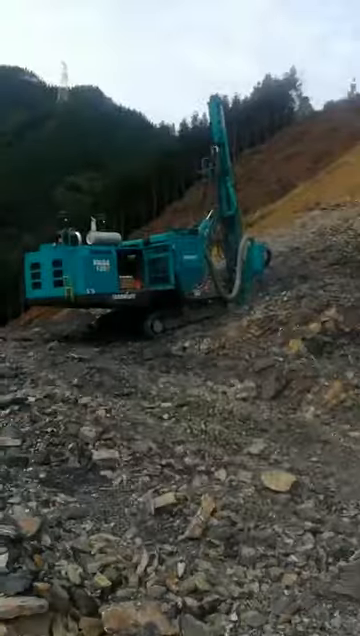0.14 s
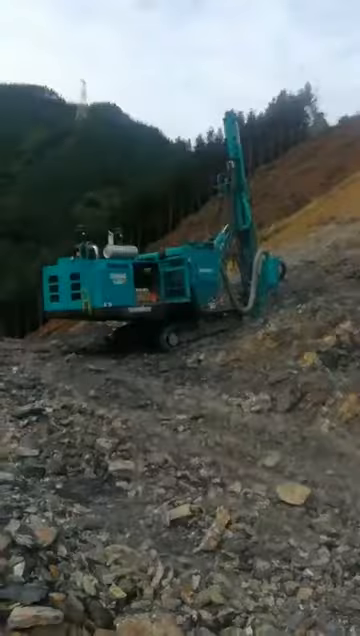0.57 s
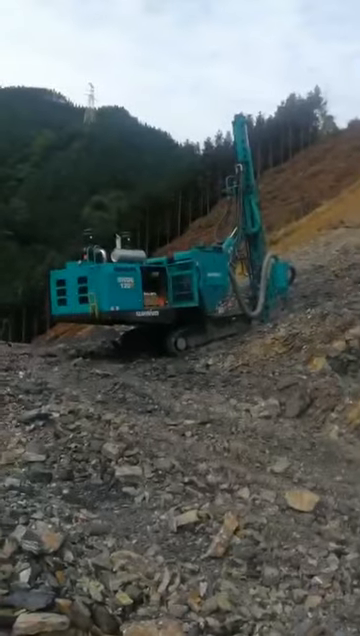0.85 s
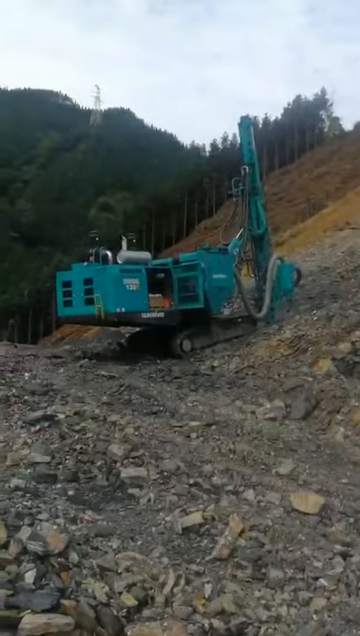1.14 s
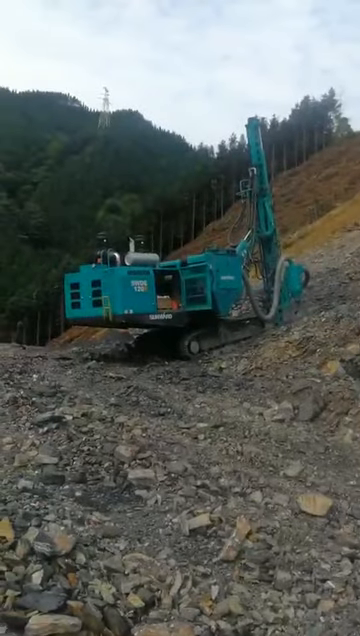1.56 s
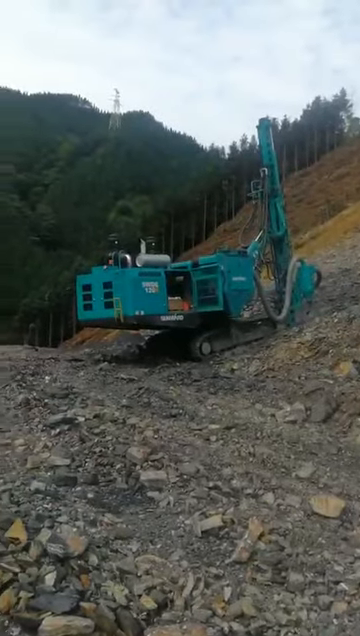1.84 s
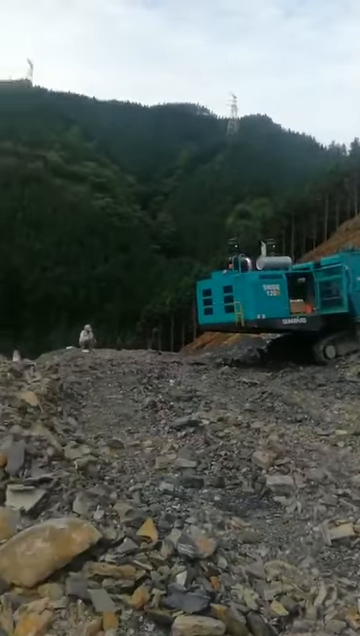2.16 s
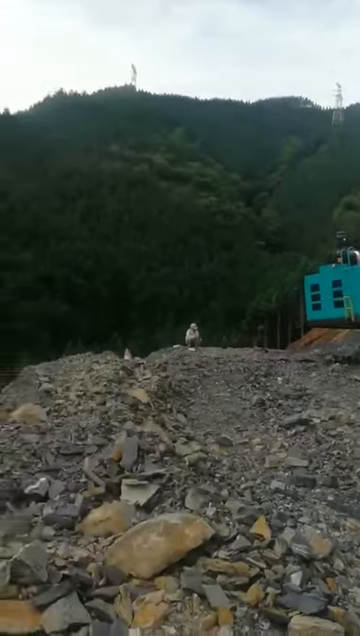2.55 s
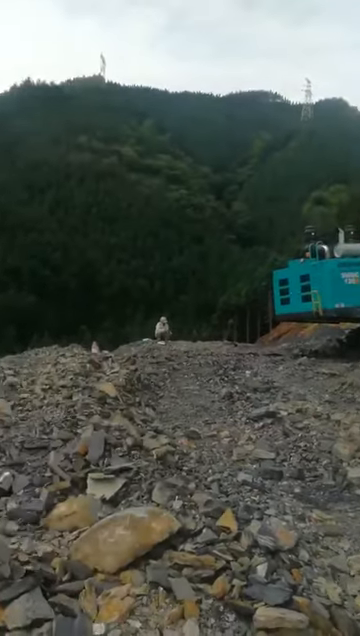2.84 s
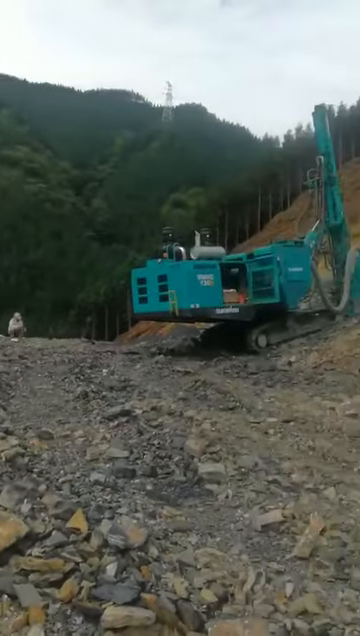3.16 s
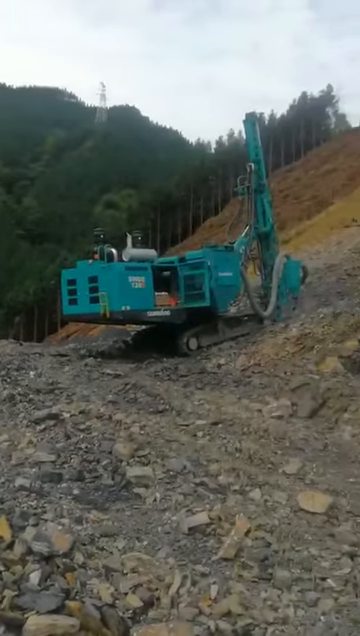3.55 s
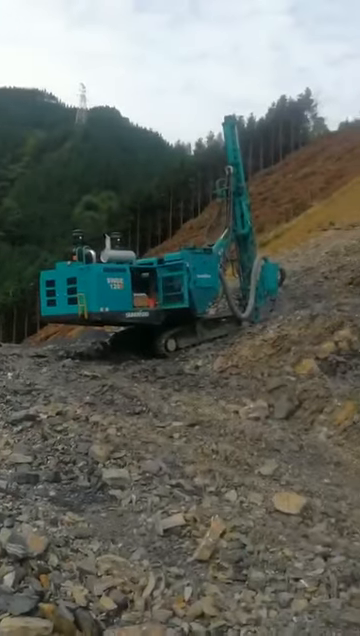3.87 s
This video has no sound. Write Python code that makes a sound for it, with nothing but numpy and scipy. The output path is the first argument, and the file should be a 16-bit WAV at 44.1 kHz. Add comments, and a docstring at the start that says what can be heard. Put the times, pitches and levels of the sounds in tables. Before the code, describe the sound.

After a brief silence, a drilling rig's rough engine roar cuts in abruptly, ticking and whining; two compressed-air bursts follow, the second while the handheld microphone is turned away, outdoors at moderate distance.

```python
"""Diesel drilling rig

A diesel drilling rig runs steadily on an open slope, to the right of a hand-held camera.
Wavering sinusoids give firing orders, exhaust hum and pump whine; shaped noise gives the roar.
Struck modes make a metal part tick; gated noise makes two bursts of compressed air.
The camera swings away and back, heard as a passing upper roar; its two ports differ in colour and phase.
"""
import sys
import numpy as np
from scipy import signal
from scipy.fft import rfft, irfft, next_fast_len
from scipy.io import wavfile
from scipy.ndimage import uniform_filter1d

SR = 44100
rng = np.random.default_rng(int(sys.argv[2]) if len(sys.argv) > 2 else 0)


def elevation(decibels):
    """Turn decibel levels (scalar or array-like) into linear amplitude ratios."""
    levels = np.asarray(decibels, float)
    return 10 ** (levels / 20)


def wav_record(signal):
    """Record a signal, one row per channel, as 16-bit PCM in the file named by sys.argv[1]."""
    frames = np.transpose(np.atleast_2d(signal))
    bounded = np.clip(frames, -1, 1)
    # unit amplitude maps onto the largest positive 16-bit level
    quanta = np.round(bounded * 32767).astype(np.int16)
    wavfile.write(sys.argv[1], SR, quanta)


N = 176400


def clock():
    """Sampling: time of each sample in seconds."""
    return np.arange(N) / SR


def curve(rows, column=1):
    """Linear interpolation in time: one column of a table, per sample."""
    return np.interp(clock(), [r[0] for r in rows], [r[column] for r in rows])


def read(rows, hz, column=1):
    """Interpolation on a logarithmic frequency axis: one column of a table."""
    return np.interp(np.log(hz + 1), np.log([r[0] + 1 for r in rows]), [r[column] for r in rows])


def evened(x):
    """Power normalisation: scales the rms to one."""
    return x / np.sqrt(np.mean(abs(x) ** 2) + 1e-20)


def slow(width_hz):
    """Narrow-band fluctuation: complex noise through a double pole drifts at about the given rate."""
    r = np.exp(-np.pi * width_hz / SR)
    z = rng.standard_normal(N + SR) + 1j * rng.standard_normal(N + SR)
    settled = signal.lfilter([1], [1, -2 * r, r * r], z)[SR:]
    return evened(settled)


def smoothed_grid(shape, bins, frames):
    """Correlated fluctuation: random values averaged over neighbouring bins and frames."""
    smooth = uniform_filter1d(rng.standard_normal(shape), bins, 0)
    return evened(uniform_filter1d(smooth, frames, 1))


def patchy():
    """Non-stationary turbulence: two white noises, unit power per Hz, share one fluctuating spectrum."""
    z = signal.stft(rng.standard_normal((2, N)), nperseg=512, noverlap=384)[2]
    patches = smoothed_grid(z.shape[1:], 5, 14)
    flicker = smoothed_grid(z.shape[1:], 40, 3)
    swell = slow(4.0).real[np.minimum(np.arange(z.shape[2]) * 128, N - 1)]
    z = z * elevation(1.2 * patches + 0.8 * flicker + 0.3 * swell)
    noises = signal.istft(z, nperseg=512, noverlap=384)[1][:, :N]
    return evened(noises) * np.sqrt(SR / 2)


def line(hz, db, rough, width_hz):
    """Modulation of a carrier: noise makes a tone waver in height and phase (rough 0-1)."""
    rough = np.clip(rough, 0, 1)
    carrier = np.exp(2j * np.pi * (np.cumsum(hz) / SR + rng.random()))
    envelope = np.sqrt(1 - rough ** 2) + rough * slow(width_hz)
    return np.sqrt(2) * elevation(db) * (envelope * carrier).real


# How the left port differs from the right:
# f/Hz, left minus right level/dB, likeness [0-1, before the power in ports()], left phase lead/rad
PORTS = [(25.0, 0.2, 0.99, -0.25), (89, 0.3, 1, -0.15), (217, 0.5, 0.93, -0.5), (325, -1.0, 1, -1.3),
         (469, -2.5, 1, -1.4), (610, -6.5, 0.99, -2.0), (770, -15, 0.96, -3), (832, -13, 0.9, -4.5),
         (873, -1.5, 0.3, -6), (960, -4.5, 0.93, -7.5), (1250.0, -7.5, 0.66, -7.0), (1450, -6.5, 1, -7.5),
         (1740, -18, 1, -7.5), (1980, -11.5, 1, -5.5), (2300, -7.5, 0.64, -8), (2770, -18.5, 0.63, -8.5),
         (2980, -7.5, 0.4, -6.5), (3360, -1.0, 0.74, -6.0), (3930, -9.5, 0.07, -4),
         (4200.0, -6.5, 0.55, -2.5), (4930, 0, 0.42, -3.0), (5500, -6, 0.4, 0), (5880, -5.5, 0.4, 3),
         (6850, 0, 0.75, 3.5), (7820, 0, 1, 5), (9100, -2, 0, 5), (9100, 0, 0.83, 15),
         (12000, -4.5, 0.2, 8), (14000.0, -6, 0.4, 7.5), (15200.0, 3, 0.08, -5)]


def ports(direct, scattered, left_db, right_db):
    """Interaural coherence: right hears direct sound, left a phase-shifted share plus scattered sound."""
    size = next_fast_len(N + 4096)
    hz = np.fft.rfftfreq(size, 1 / SR)
    direct, scattered = np.pad([direct, scattered], ((0, 0), (0, size - N)), "reflect")
    direct, scattered = rfft(direct), rfft(scattered)
    same = np.clip(read(PORTS, hz, column=2), 0, 1) ** 0.6
    lead = np.exp(1j * read(PORTS, hz, column=3))
    left = same * lead * direct + np.sqrt(1 - same ** 2) * scattered
    both = np.array([left * elevation(left_db(hz)), direct * elevation(right_db(hz))])
    return irfft(both, size)[:, :N]


def rig_ports(direct, scattered):
    """Diffraction at the listener: the left port is coloured against an uncoloured right."""
    return ports(direct, scattered, lambda hz: read(PORTS, hz), lambda hz: 0 * hz)


# Common gain of roar and casing: t/s, level/dB
RIG_LEVEL = [(.43, 4), (.75, 4), (.96, 3), (1.02, .5), (1.4, 0.5), (2, 0.5), (2.5, 0), (2.9, 0.5),
             (3.2, 0.86), (3.6, 0.5), (4, 0.5)]


def rig_gain():
    """Amplitude scaling: the gain shared by roar and casing over time."""
    return elevation(curve(RIG_LEVEL))


# Running count of the ticks: t/s, tick number
TICK_CLOCK = [(.4329, 0), (1.7419, 32), (2.9307, 61), (3.0993, 65), (4.004, 87)]


def tick_count():
    """Phase of a periodic event: each whole number is one tick."""
    return curve(TICK_CLOCK)


# Colour of the roar at the right port: f/Hz, relative level/dB per Hz
ROAR_COLOUR = [(25, -26), (45, -14.5), (110, -13.5), (160, -14.5), (220, -12.5), (270, -4.5), (330, -10),
               (390, -19.5), (460, -8), (600, -5.5), (760, -3.5), (830, -4.5), (900, -16.5), (1020, -5.5),
               (1250, -7.5), (1450, -4), (1700, -1.5), (1950, -4), (2330, -10), (2750, -9), (3000, -16),
               (3350, -24), (3800, -17), (4200, -18.5), (4800, -20), (5400, -28), (5900, -22),
               (6700, -29.5), (7700, -31.5), (8600, -36), (9300, -40.5), (10200, -42), (11500, -38.5),
               (12500, -50.5), (14000, -42), (15200, -65)]
# Extra gain of the roar above the high-pass edge: t/s, level/dB
TREBLE = [(.43, 3), (1.5, 2.5), (2, 4), (2.5, 1.5), (2.8, 2), (3.6, -2.5), (3.8, 0), (4, 1)]


def roar():
    """Broadband radiation: filtered noise throbs with each tick, and its treble level drifts."""
    since_tick = tick_count() % 1
    throb = evened(1 + 0.28 * np.exp(-since_tick / 0.14))
    steady = ports(*(patchy() * throb),
                   lambda hz: read(ROAR_COLOUR, hz) + read(PORTS, hz),
                   lambda hz: read(ROAR_COLOUR, hz))
    treble_filter = signal.butter(3, 9100, "high", fs=SR, output="sos")
    treble = signal.sosfiltfilt(treble_filter, steady)
    steady = steady + (elevation(curve(TREBLE)) - 1) * treble
    return elevation(-54.5) * rig_gain() * steady


# Upper roar, growing while the camera is turned: t/s, relative level/dB
TURN_LEVEL = [(1.7, -23), (1.95, -6.5), (2.2, -3), (2.45, 0.5), (2.84, -3), (2.95, -11), (3.2, -16),
              (3.6, -10), (3.9, -11.5)]
# Its colour: f/Hz, left relative level/dB per Hz, right relative level/dB per Hz
TURN_COLOUR = [(2010, -19, -40), (2460, -33, -10.5), (2840, -25, -2), (3370, -37, -19.5), (3750, -17, -25),
               (4110, -43, -13), (4800, -19, -7.5), (5470, -47, -18.5), (6000, -44, -41),
               (6960, -61.5, -27.5)]


def turned_roar():
    """Directivity: the turned camera hears more band-limited noise, with its own colour at each port."""
    turned = ports(*patchy(), lambda hz: read(TURN_COLOUR, hz),
                   lambda hz: read(TURN_COLOUR, hz, column=2))
    band = signal.butter(4, [1800, 7500], "band", fs=SR, output="sos")
    return elevation(-54.5 + curve(TURN_LEVEL)) * signal.sosfilt(band, turned)


# Thin whistle near 4 kHz: t/s, level/dB
WHISTLE = [(.43, -46), (2, -65), (2.5, -55), (2.62, -42), (2.8, -62), (3.3, -67), (3.65, -41), (4, -42)]


def whistle():
    """Narrow-band noise: a tone made almost wholly of random modulation."""
    return line(np.full(N, 4015), curve(WHISTLE), 0.95, 190)


# Ringing of the casing: f/Hz, width/Hz, level/dB before the common gain
CASING = [(1347, 51, -47.5), (1499, 12, -46.5), (1657, 18, -43), (1750, 24, -42.5), (1837, 19, -42.5),
          (1940, 70, -44.5), (2762, 74, -44.5), (3850, 12, -65), (4330, 20, -69), (11700, 530, -67)]


def casing():
    """Forced resonance: each mode of the casing is a narrow band of noise."""
    return rig_gain() * sum(line(np.full(N, hz), db, 1.0, width) for hz, width, db in CASING)


# Strength of the regular blows, before a random spread: t/s, level/dB
TICK_LEVEL = [(.43, -40), (1, -56), (1.8, -47.5), (2.1, -59), (2.7, -57), (2.95, -44.5), (3.25, -50.5),
              (3.5, -44.5), (3.7, -48), (4, -49)]
# Harder blows: t/s, level/dB before a random spread
LOUD_TICKS = [(0.515, -37), (0.5551, -41), (1.7419, -43), (1.949, -44), (2.8893, -39), (3.5523, -45),
              (3.7978, -43), (3.839, -42)]
# Modes of the struck part: f/Hz, relative level/dB, decay time t60/s
TICK_MODES = [(7550, 1.5, 0.03), (7990, 4, 0.02), (8230, 0, 0.028), (8530, -2.5, 0.028), (2670, -3, 0.016)]


def ticks():
    """Impact excitation: blows at a nearly steady rate ring the modes of a metal part, which also hisses."""
    at = np.flatnonzero(np.diff(np.floor(tick_count())) > 0)
    blows, t = np.zeros(N), np.arange(2000) / SR
    blows[at] = elevation(curve(TICK_LEVEL)[at] + 1.5 * rng.standard_normal(len(at)))
    for s, db in LOUD_TICKS:
        centre = round(s * SR)
        blows[centre - 300:centre + 300] = 0  # a hard blow replaces any regular one close by
        blows[centre] = elevation(db)
    out = np.zeros(N)
    for hz, db, t60 in TICK_MODES:
        decay = elevation(db - 60 * t / t60) * np.minimum(t / 0.0017, 1)
        ring = decay * np.sin(2 * np.pi * hz * t)
        varied = blows * rng.uniform(0.7, 1.54, N) * rng.choice([-1, 1], N)
        out += signal.oaconvolve(varied, ring)[:N]
    out += line(np.full(N, 7830), curve(TICK_LEVEL) - 11.5, 0.87, 550)  # continuous rattle
    return rig_ports(out, out)


# Timing of the air bursts: start t/s, rise/s, hold/s, fall t60/s
BURSTS = [(0.567, 0.045, 0.091, 0.41), (2.538, 0.056, 0.1, 0.27)]
# Colours of the first burst (camera facing) and the second (camera turned):
# f/Hz, left relative level/dB per Hz, right relative level/dB per Hz
BURST_FACING = [(1500, -10, -2.5), (2320, -24, -13), (2700, -21, 4.5), (3330, -15, -15), (4000, -17, -10.5),
                (4800, -14, -23), (5500, -28, -13), (6340, -12, -20), (6860, -20, -12.5), (7960, -17, -22),
                (9300, -32, -26), (10200, -29, -39), (11500, -35, -26), (12500, -40, -31),
                (13360, -40, -32), (15000, -44, -32)]
BURST_TURNED = [(1560, -19, -4), (2300, -33, -13), (2730, -17, 0), (3500, -16, -13), (3920, -16, 2),
                (4700, -17, -4.5), (5800, -23, -11.5), (6120, -38, -8.5), (7050, -18, -24),
                (7900, -39, -31), (9300, -34, -24), (10200, -38, -31), (11500, -46, -21), (12500, -45, -40),
                (13500, -46, -22), (15000, -70, -85)]


def air():
    """Jet noise: compressed air hisses with a quick rise, a short hold and an exponential fall."""
    out = np.zeros((2, N))
    highpass = signal.butter(3, 1200, "high", fs=SR, output="sos")
    for (start, rise, hold, t60), colour in zip(BURSTS, (BURST_FACING, BURST_TURNED)):
        t = clock() - start
        onset = np.sin(np.pi / 2 * np.clip(t / rise, 0, 1)) ** 2
        fall = elevation(-60 * np.maximum(t - rise - hold, 0) / t60)
        hiss = ports(*patchy(), lambda hz: read(colour, hz), lambda hz: read(colour, hz, column=2))
        out += onset * fall * signal.sosfilt(highpass, hiss)
    return elevation(-55) * out


# Pump whine: t/s, f/Hz, level/dB before the offset of each multiple
PUMP = [(0.44, 501.5, -35.5), (1.09, 504, -37), (1.6, 502, -34), (1.66, 502.6, -40), (1.73, 506.7, -35.5),
        (2.55, 501.6, -38), (2.66, 504.6, -44.5), (2.91, 501, -36.5), (3.96, 503.5, -37), (4.0, 506, -36)]
# Its harmonics: multiple of f, level offset/dB
PUMP_MULTIPLES = [(1, 3), (2, -8.5), (3, -12), (5, -15)]


def pump():
    """Harmonic series: the pump sounds at whole multiples of a wandering fundamental."""
    hz, level = curve(PUMP), curve(PUMP, column=2)
    return sum(line(round(k) * hz, level + db, 0.12, 8) for k, db in PUMP_MULTIPLES)


# Wavering hum of the exhaust: t/s, f/Hz, level/dB
HUM = [(0.44, 291, -36.5), (1.1, 294.6, -41), (1.2, 294, -35.5), (1.9, 287.5, -39.5), (2.06, 287.8, -33.5),
       (2.14, 287.5, -44.5), (2.9, 292.9, -37.5), (3.4, 289.4, -38.5), (3.97, 287, -41), (4.0, 285.7, -51)]


def exhaust():
    """Frequency and amplitude modulation: the exhaust hums as one wavering tone."""
    return line(curve(HUM), curve(HUM, column=2), 0.45, 12)


# Engine orders: multiple of the shaft rate, relative level/dB, share of rough noise [0-1]
ORDERS = [(3.013, 0.5, 0.16), (4.99, -15.5, 0.4), (5.99, -11, 0.08), (6.46, -19, 0.7), (8.56, -13.5, 0.63),
          (9.385, -6, 0.52), (11.01, -8, 0.5), (13.05, -15.5, 0.7), (14.9, -21, 0.1), (30, -12, 0.2)]
# Gain of all the orders: t/s, level/dB
ORDERS_LEVEL = [(0.44, -35), (1.43, -40.5), (1.49, -39.5), (2.44, -39.5), (2.65, -42.5), (3.03, -38.5),
                (3.36, -40.5), (3.45, -39), (3.97, -39), (4.0, -39)]


def engine():
    """Order theory: tones at multiples of shaft rate; uneven cylinders throb them once in two turns."""
    shaft = 29.34 * (1 + 0.002004 * slow(0.91).real)  # turns per second
    orders = sum(line(k * shaft, db, rough, 5.3) for k, db, rough in ORDERS)
    cycle = 1 + 0.1 * np.cos(np.pi * np.cumsum(shaft) / SR)
    return orders * elevation(curve(ORDERS_LEVEL)) * cycle


def tones():
    """Superposition: the tonal sources share one path, a rotated copy serving as scattered sound."""
    out = whistle() + casing() + pump() + exhaust() + engine()
    return rig_ports(out, np.roll(out, SR // 5))


def scene():
    """Linear superposition of all the sources of the rig."""
    return roar() + turned_roar() + ticks() + air() + tones()


def roll_off(x):
    """The treble ends steeply here."""
    return signal.sosfilt(signal.butter(12, 15600, fs=SR, output="sos"), x)


def record(dry):
    """Band limitation and gating: a low-pass at 15.3 kHz, then silence until the sound cuts in."""
    lowpass = signal.firwin(511, 15300, window=("kaiser", 9), fs=SR)
    x = signal.oaconvolve(dry, lowpass[None], "same")
    cut_in = np.clip((clock() - 0.4292) / 0.00037, 0, 1)  # start and ramp in s
    return roll_off(x * cut_in)


dry = scene()
out = record(dry)
wav_record(out)
```